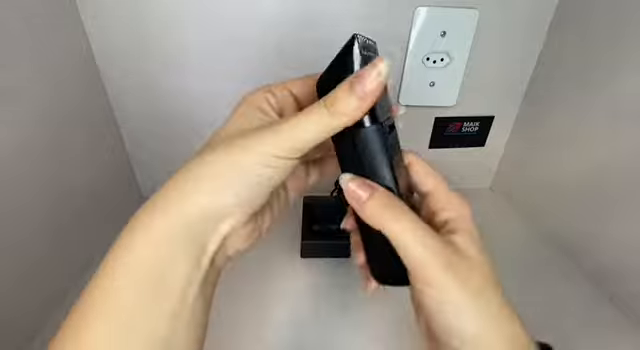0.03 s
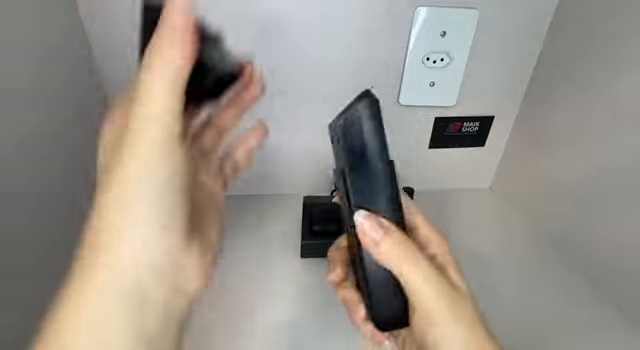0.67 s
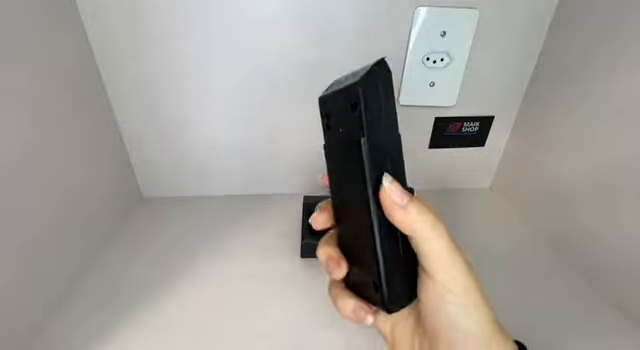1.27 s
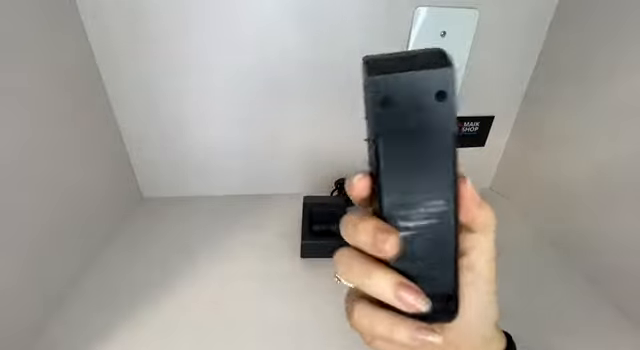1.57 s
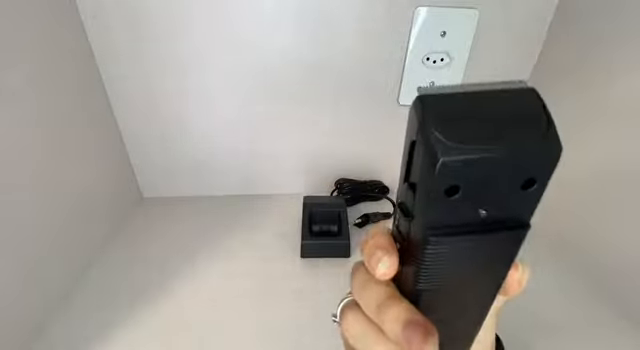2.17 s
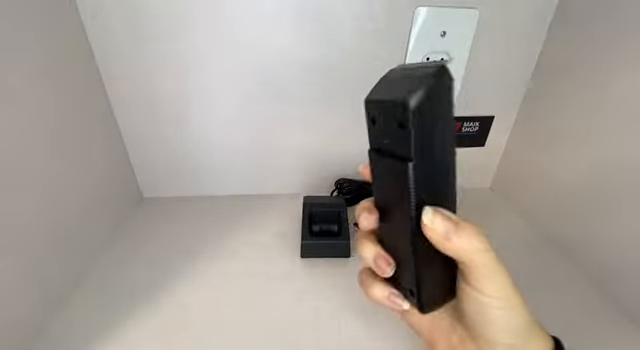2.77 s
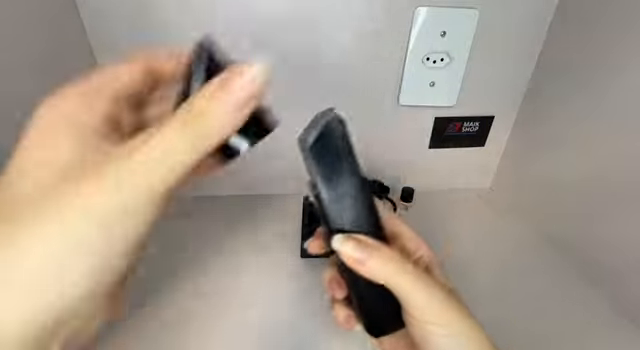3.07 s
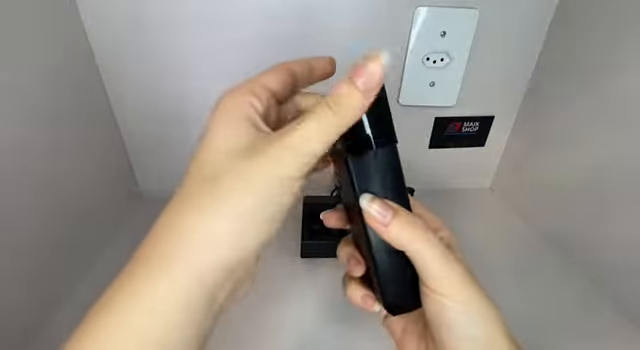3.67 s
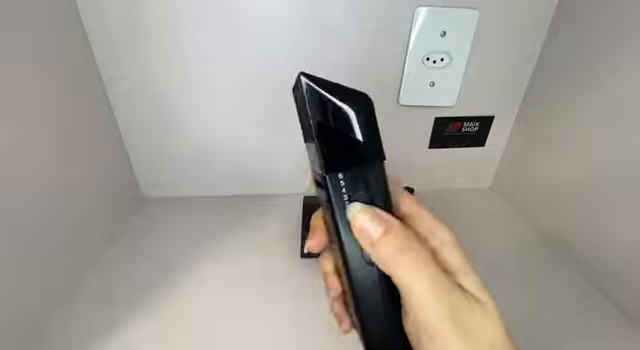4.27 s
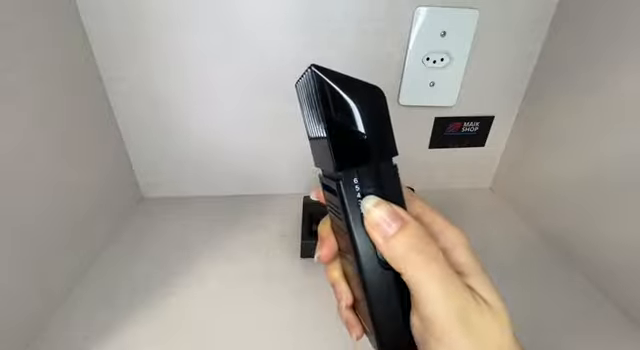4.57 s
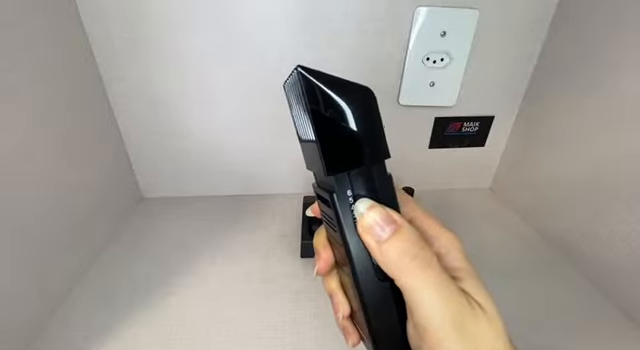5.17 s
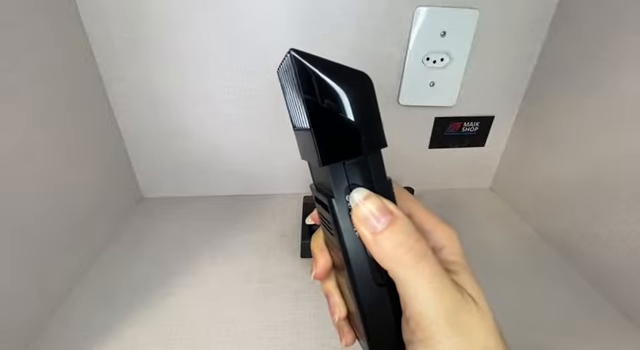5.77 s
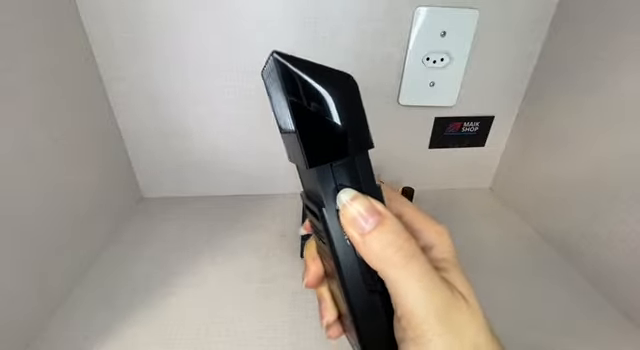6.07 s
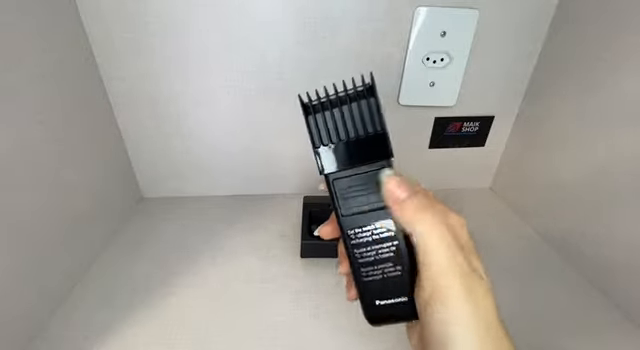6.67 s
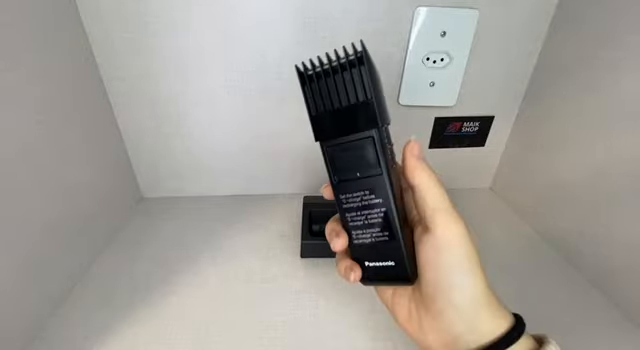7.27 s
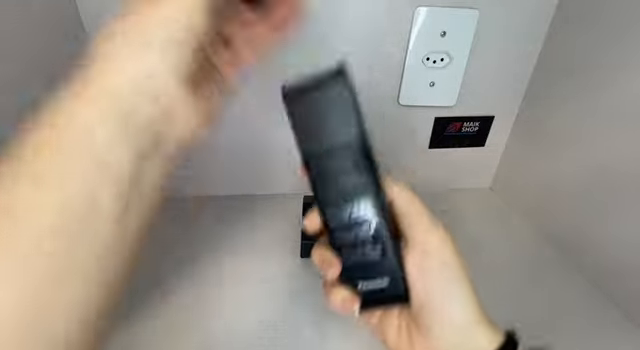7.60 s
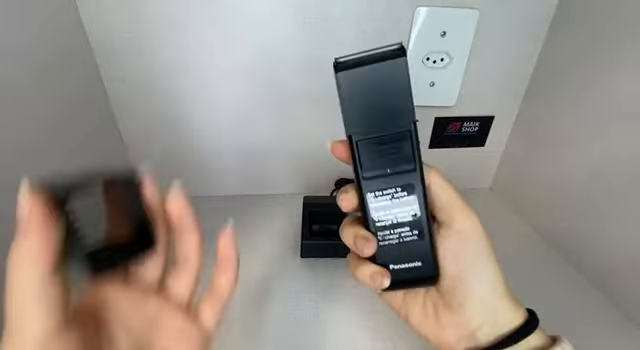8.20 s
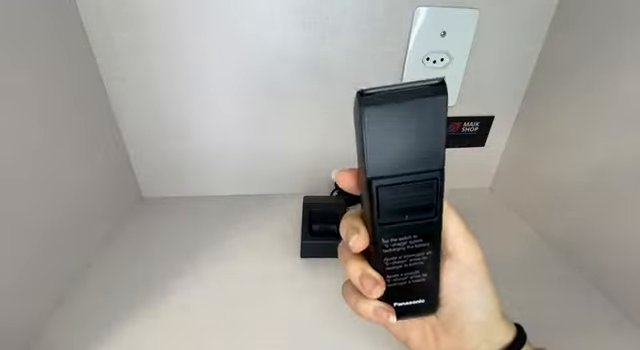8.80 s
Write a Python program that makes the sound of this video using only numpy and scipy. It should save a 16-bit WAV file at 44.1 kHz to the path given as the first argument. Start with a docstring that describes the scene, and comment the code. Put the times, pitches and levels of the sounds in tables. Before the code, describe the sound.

A small hair trimmer is handled close up in a shelf niche in a quiet room, over a low rumble that thins at about 4 seconds. At 0.4 seconds its plastic comb comes off in a quick cluster of clicks, followed by faint swishes of hands. More clicks come at 3.2 seconds, then the loudest snap at 3.5 as the comb goes back on. From 4.3 to 6 seconds it steps through its settings with irregular, briefly ringing clicks and soft, hollow plastic rubbing. At 6.3 seconds a click starts the motor: an even, raspy electric buzz whose tone shifts and grows slightly as the hand turns it. At 7.5 seconds the comb is pulled off with a sharp snap, a scrape and a short chatter against the running head. The buzz then carries on, brighter, until the end at nearly 9 seconds.

```python
'''A shelf niche in a quiet room, over a low rumble: a small hair trimmer is handled.
Its plastic comb is pulled off, snapped back on and stepped through its detents; each click rings in
the plastic and the niche, and the sliding comb rubs through two hollow resonances.
Then the motor starts: the blade knocks at both ends of its stroke, the case hums, the teeth rasp.
The comb chatters as it is pulled off again, and the buzz turns brighter.'''
import sys
import numpy as np
from scipy import signal
from scipy.fft import rfft, irfft, next_fast_len
from scipy.io import wavfile

SR = 44100
rng = np.random.default_rng(int(sys.argv[2]) if len(sys.argv) > 2 else 0)


def digitize_waveform(pressure):
    """Quantize a signal to 16-bit integers and store it at the path in sys.argv[1].

    Rows of a 2-D input are taken as channels; values are limited to [-1, 1].
    """
    field = np.atleast_2d(pressure).T
    bounded = np.clip(field, -1, 1)
    quanta = np.round(bounded * 32767).astype(np.int16)
    wavfile.write(sys.argv[1], SR, quanta)


N = 389844
TIME = np.arange(N) / SR

MOTOR_ON_S, COMB_OFF_S = 6.273, 7.54
KICK_HZ, COMBED_HZ, BARE_HZ = 94.5, 101.3, 100.53  # motor turns per second
CHATTER_PEAK_S, CHATTER_HALF_S = 7.68, .085
CONTROL_SAMPLES = 200

# Case harmonics, comb on / off: (multiple of motor speed, level [dB])
HARMONICS_COMBED = [(1, -13), (2, -27), (3, -30), (4, -41), (5, -16), (6, -17), (7, -21.5), (8, -33),
                    (9, -21.5), (10, -15), (11, -9), (12, -19), (13, -6), (14, -5.5), (15, 2.5), (16, -8),
                    (17, -15), (18, -13), (19, -12.5), (20, -27), (21, -7), (22, -5), (23, -2), (24, -12),
                    (25, 3), (26, -12), (27, -10), (28, -5), (29, -1), (30, -3), (31, -14), (32, -8),
                    (33, -21), (34, -7), (35, -7.5), (36, -16), (37, -5), (38, -8), (39, -17), (40, -12.0),
                    (41, -21), (42, -3.5), (43, -1), (44, -6), (45, -10), (46, -7), (47, -11.5), (48, -8),
                    (49, -25.0), (50, -2.5), (51, -23.5), (52, -16), (53, -15), (54, -5), (55, -7),
                    (56, -3.5), (57, -12.0), (58, -15), (59, -10), (60, -19), (61, -11), (62, -8.5),
                    (63, -8)]
HARMONICS_BARE = [(1, -10.5), (2, -26.5), (3, -27.5), (4, -47), (5, -23.5), (6, -16.5), (7, -37), (8, -39),
                  (9, -21.5), (10, -7), (11, -9), (12, -10.5), (13, -11.5), (14, -17), (15, -10), (16, -30),
                  (17, -5.5), (18, -9), (19, -3), (20, -32), (21, -2.5), (22, -13), (23, -4.5), (24, -4.5),
                  (25, -6), (26, -20), (27, -7), (28, -0.5), (29, -11), (30, -4.5), (31, -3), (32, 1.5),
                  (33, -5.5), (34, 0), (35, -20), (36, -7), (37, -20), (38, -11), (39, -6), (40, -10.5),
                  (41, -17), (42, -3.5), (43, -8), (44, -4.5), (45, -22.0), (46, -9), (47, -17), (48, -4.5),
                  (49, -10), (50, 4), (51, -9.5), (52, 0.5), (53, -4), (54, -11), (55, -3), (56, -3),
                  (57, -18), (58, -13), (59, -1.5), (60, -6), (61, -10), (62, -24), (63, -15), (64, -15),
                  (65, -11)]
# Buzz as the hand turns the trimmer, comb on / off:
# (time [s], low [dB], middle [dB], bright [dB], left-right [dB], lower beam [Hz], upper beam [Hz])
BUZZ_COMBED = [(6.3, -54, -45, -59, -0.5, 2500, 4430), (6.402, -51, -48, -51, 0, 2530, 4570),
               (6.48, -49.5, -43, -51, -1, 2460, 5500), (6.61, -49, -43, -47, -1, 2420, 5500),
               (6.84, -46, -42, -44, -1, 2830, 4670), (6.924, -44.5, -42.5, -44, 0, 2930, 5500),
               (7.092, -44.5, -43, -44.5, -1, 3020, 5200), (7.192, -47.5, -43.5, -43.5, -1.5, 2900, 5040),
               (7.5, -47.5, -40, -41.5, -0.5, 2850, 4260)]
BUZZ_BARE = [(7.6, -48, -42.5, -41, 1.3, 3000, 5600), (7.688, -44.5, -39.5, -48, -0.5, 2840, 4970),
             (7.762, -48.5, -40, -38.5, 0.0, 3070, 5940), (7.97, -48.5, -40, -40, -0.57, 3350, 4900),
             (8.18, -47, -40, -36, 1.2, 2700, 5440), (8.28, -47.5, -39.5, -37.5, 0.7, 2930, 5570),
             (8.412, -48, -42, -37.5, 1.5, 2850, 5270), (8.628, -47.5, -41, -40, 0.41, 2730, 5200),
             (8.82, -48, -42.5, -38, -0.21, 2780, 5240)]


def trimmer(treble_db, bare_boost_db, shake_db, damping):
    """The motor swings the blade in its case; the comb covers part of the treble."""
    bare = np.clip((TIME - COMB_OFF_S) / .012, 0, 1)
    combed = np.clip((TIME - MOTOR_ON_S) / .0092, 0, 1) - bare
    turns = motor_turns(bare)
    hum = combed * case_hum(turns, HARMONICS_COMBED, BUZZ_COMBED, heard=combed > 0)
    hum += bare * case_hum(turns, HARMONICS_BARE, BUZZ_BARE, heard=bare > 0)
    hum *= from_db(shake_db * drift(41))
    hum *= 1 - damping * bell(TIME, CHATTER_PEAK_S, CHATTER_HALF_S)  # the sliding comb damps the case
    treble = blade_clatter(turns, combed, bare) + teeth_rasp(turns, combed, bare)
    treble *= from_db(treble_db + bare_boost_db * bare)
    *_, pan_db, _, _ = curves([*BUZZ_COMBED, *BUZZ_BARE])
    return panned(pan_db) * (hum + treble + comb_chatter(turns))


def motor_turns(bare, spin_up_s=.022, sag_hz_per_s=.24, flutter=.0005):
    """Turn count: quick spin-up, slow sag under the rubbing comb, then steady and slightly slower."""
    running_s = np.maximum(TIME - MOTOR_ON_S, 0)
    spin_up_hz = COMBED_HZ - (COMBED_HZ - KICK_HZ) * np.exp(-running_s / spin_up_s)
    combed_hz = spin_up_hz - sag_hz_per_s * running_s
    speed_hz = (TIME > MOTOR_ON_S) * ((1 - bare) * combed_hz + bare * BARE_HZ)
    return np.cumsum(speed_hz * (1 + flutter * drift(25))) / SR


# Trimmer's path through the niche: (time [s], distance [m])
HAND_TRAVEL = [(6.27, 0), (6.65, .04), (7.0, .11), (7.5, .16), (7.85, .27), (8.3, .33), (8.84, .37)]
# Standing waves, opposite in the two channels: (centre [Hz], half width [Hz], level [dB])
STANDING_WAVES = [(1140, 90, 11.5), (1830, 210, 5)]


def case_hum(turns, harmonics, buzz, heard, trim_db=(-1.24, -.35, -2), echo_db=-1, waver_db=-3.5):
    """Harmonics of the knocking case; beams and wall echoes swell and fade each as the hand moves."""
    steps_s = TIME[heard][::CONTROL_SAMPLES]
    *band_db, _, lower_hz, upper_hz = curves(buzz, steps_s)
    travel_m, = curves(HAND_TRAVEL, steps_s)
    multiples, level_db = np.transpose(harmonics)
    hz = multiples[:, None] * BARE_HZ
    beam_db = 4.5 * (bell(hz, lower_hz, half_width=330) + bell(hz, upper_hz, half_width=330))
    gain = from_db(level_db[:, None] + beam_db - beam_db.mean(axis=1, keepdims=True))
    short_waves = 1 / (1 + (1500 / hz) ** 2)
    standing = sum(from_db(db) * bell(hz, centre, half) for centre, half, db in STANDING_WAVES)
    mid = gain * (1 + from_db(echo_db) * wall_echoes(hz, travel_m) * short_waves)
    side = gain * (from_db(echo_db) * wall_echoes(hz, travel_m) + 1j * standing)
    swells = np.array([mid + side, mid - side])
    swells += from_db(waver_db) * short_waves * gain * blade_waver((2, *gain.shape))
    bands = np.digitize(hz[:, 0], (2000, 4000))  # low, middle, bright
    for band, db in enumerate(band_db):
        band_rms = np.sqrt(np.sum(np.abs(mid[bands == band]) ** 2, axis=0) / 2)
        swells[:, bands == band] *= from_db(db + trim_db[band]) / band_rms
    out = np.zeros((2, N))
    for k, phase in enumerate(knock_phases(hz)):
        tone = np.exp(1j * (2 * np.pi * multiples[k] * turns[heard] + phase))
        for channel in range(2):
            out[channel, heard] += np.real(tone * np.interp(TIME[heard], steps_s, swells[channel, k]))
    return out


def wall_echoes(hz, travel_m, count=6, sound_m_per_s=343):
    """Summed echoes of each harmonic; their paths grow or shrink as the trimmer travels."""
    slant = rng.uniform(-1.005, 1, (count, 1, 1))
    detour_m = rng.uniform(.15, 2.2, (count, 1, 1))
    path_m = detour_m + 2 * slant * travel_m
    return np.exp(-2j * np.pi * hz * path_m / sound_m_per_s).sum(axis=0) / np.sqrt(count)


def blade_waver(shape, rate_hz=10):
    """The blade never seats quite the same way, so each harmonic wavers in strength and phase."""
    lowpass = signal.butter(2, rate_hz, fs=SR / CONTROL_SAMPLES, output="sos")
    real, imaginary = signal.sosfilt(lowpass, rng.standard_normal((2, *shape)))
    return (rms_one(real) + 1j * rms_one(imaginary)) / np.sqrt(2)


def knock_phases(hz, case_t60_s=.02):
    """Harmonic phases of two knocks half a turn apart, each ringing out in the case."""
    rings = reflections(case_t60_s, rise_s=.0002, size=SR // 50)
    forth, back = np.exp(-2j * np.pi * hz * TIME[:SR // 50]).dot(rings.T).T
    return np.angle(forth + back * np.exp(-1j * np.pi * hz[:, 0] / BARE_HZ))


def blade_knocks(turns, return_db=-6.5, uneven_db=2.5):
    """The blade knocks at both ends of its stroke with uneven force."""
    knocks = np.zeros(N)
    for offset_turns, level_db in ((0, 0), (.5, return_db)):
        at = np.interp(np.arange(1, int(turns[-1]) - 1) + offset_turns, turns, np.arange(N))
        force = from_db(level_db + uneven_db * rng.standard_normal(N // 100)[:len(at)])
        taps = at.astype(int)[:, None] + np.arange(-4, 6)
        np.add.at(knocks, taps, force[:, None] * np.sinc(taps - at[:, None]))
    return knocks


# Clatter spectrum, comb on / off: (frequency [Hz], level [dB])
BLADE_COMBED = [(1500, -3), (4000, 4.5), (6300, 5.5), (7000, 2), (7600, -3.5), (8300, 1), (9400, -4.5),
                (10400, -2.5), (11300, -1.5), (12000, -15)]
BLADE_BARE = [(1800, -2), (4000, 2.5), (6400, 9.5), (7200, 6.5), (8000, -2), (8900, 1.5), (9900, -5.5),
              (11000, 1.5), (12000, -10.5)]


def blade_clatter(turns, combed, bare, sway_hz=1.1):
    """Knocks ring in the blade and the niche, whose echoes shift as the hand moves."""
    knocks = blade_knocks(turns)

    def ring(spectrum, t60_s, sway_rad):
        angle = sway_rad * drift(sway_hz)
        sound = coloured(shifting_ring(knocks, angle, t60_s, rise_s=.000067), spectrum)
        return sound / np.sqrt(np.mean(sound[:, TIME > MOTOR_ON_S] ** 2, axis=1, keepdims=True))

    return (combed * ring(BLADE_COMBED, t60_s=.13, sway_rad=1.23)
            + bare * ring(BLADE_BARE, t60_s=.12, sway_rad=.96))


# Rasp spectrum: (frequency [Hz], level [dB])
TEETH_SPECTRUM = [(300, -22), (800, -16), (1500, -1), (2700, 0), (5500, -2), (7500, -4), (11500, -27)]


def teeth_rasp(turns, combed, bare, rasp_db=-13, scrape_db=1, scrape_s=.068):
    """The teeth rasp twice a turn; the comb scrapes along the shaking head as it comes off."""
    rasp = rms_one(coloured(stereo_noise(0), TEETH_SPECTRUM)) * (1 + np.sin(2 * np.pi * 2 * turns))
    decay = np.exp(-np.maximum(TIME - COMB_OFF_S, 0) / scrape_s)
    scrape = bare * decay * from_db(scrape_db + 2.5 * drift(40))
    return (from_db(rasp_db) * (combed + bare) + scrape) * rasp


# Loose comb's spectrum: (frequency [Hz], level [dB])
CHATTER_SPECTRUM = [(1200, -9), (2200, -5), (3400, 5.5), (4500, 4.5), (6300, 7), (7400, -11), (11000, -33)]


def comb_chatter(turns, level_db=-35, strikes_per_turn=4, uneven_db=.5, jitter_turns=.0015):
    """The running head strikes the loose comb, whose ring shifts as it slides off."""
    slide = (TIME - CHATTER_PEAK_S) / CHATTER_HALF_S
    first, last = np.interp([-2, 2], slide, turns)
    due = np.arange(first, last, 1 / strikes_per_turn)
    late, harder = rng.standard_normal((2, N // 100))[:, :len(due)]
    at = np.searchsorted(turns, due + jitter_turns * late).clip(0, N - 1)
    strikes = np.zeros(N)
    strikes[at] = from_db(uneven_db * harder)
    ring = shifting_ring(strikes, np.pi * slide, t60_s=.028, rise_s=.0002)
    sound = coloured(ring, CHATTER_SPECTRUM)
    return from_db(level_db) * np.exp(-slide ** 4) * sound / sound[:, np.abs(slide) < 1].std()


# Plastic clicks, and a faint bright hiss just before the loudest snap; body, edge vs. middle band:
# (time [s], level [dB], body [dB], edge [dB], ring [Hz], upper ring [Hz], ring gain [dB])
SNAPS = [(0.063, -43, 12.5, -8, 1990, 4700, -8), (0.3744, -24, 12, 4.5, 2620, 8600, 1),
         (0.378, -23.5, 6.5, 5, 2180, 5700, -3), (0.39, -23, 8.5, 7, 3300, 6300, 3),
         (0.397, -23, 2, 7, 2200, 8450, 6), (0.402, -21, -2, 5.5, 2610, 8400, 10),
         (0.4076, -22, 4, 4, 2200, 6560, 7.5), (0.4152, -24.5, 3, 3.5, 3380, 8470, 5),
         (3.2349, -15, 6, -9.5, 2210, 3505, 3), (3.2427, -20, -6, -2, 2400, 6200, 6),
         (3.259, -21, 0.5, -9, 2100, 6800, 8), (3.2695, -18.5, 2, -10, 1420, 3030, 3),
         (3.465, -31, 5, 7, 2700, 5400, 0), (3.481, -6.5, 0, 4, 3030, 5390, 1.5),
         (3.963, -52, 11, -7, 2720, 2980, 5.5), (4.1119, -47, 8.5, -6, 2800, 4320, 3.5),
         (4.19, -44, -10.5, -10, 2740, 4290, 2.5), (4.315, -51.5, -8, -7, 2910, 3500, 3),
         (4.358, -26.5, -23, -3, 3160, 6500, 1.5), (4.443, -34.5, -1, 0.5, 2880, 6630, 2.5),
         (4.4481, -19.5, 2.5, 1.5, 3680, 4570, 0), (4.827, -19.5, 1, 1.5, 5050, 8440, 7),
         (4.8296, -19.5, 4, -2, 3000, 4500, 5.5), (5.1725, -37, 9, -7, 3200, 6490, 1),
         (5.1963, -27.5, 8.5, 4.5, 3310, 6700, 1.5), (5.52, -45.5, 10.5, -6.5, 1918, 5300, -4.5),
         (5.636, -36.5, -3, -2.5, 2655, 5320, 2), (5.651, -24.5, -4, -2, 3400, 7680, 2.5),
         (5.912, -46, 7.5, -9, 1640, 4020, 5), (5.973, -39, 11, -5, 3660, 8600, 1),
         (5.9957, -18.5, 0.5, 5.5, 3770, 4180, 9), (5.9995, -24.5, 11, -1, 830, 3250, 11.5),
         (6.272, -30, 4.5, -3.5, 2570, 4370, 5), (7.5281, -8.5, 0.5, -2, 4600, 7880, 7.5),
         (7.5522, -19, 0, 2.5, 2600, 5600, 5)]
# Plastic's spectrum: (frequency [Hz], level [dB])
PLASTIC_SPECTRUM = [(180, -5.5), (300, -6), (560, -11), (880, -3.5), (1150, -1.5), (2300, -1), (4700, 2),
                    (7700, 0.5), (10500, 0.5), (12000, -4.5)]


def snaps(gain_db, niche_t60_s, crack_t60_s, crack_db, ring_width_hz, room_t60_s, room_db):
    """Each crack rings briefly in the plastic and the niche, then dies away in the room."""
    cracks, notes = np.zeros((2, 2, N + SR))
    bands = [signal.butter(2, hz, kind, fs=SR, output="sos")
             for hz, kind in ((1770, "low"), ([1770, 4730], "band"), (4730, "high"))]
    size = SR // 6
    for s, level_db, body_db, edge_db, ring_hz, upper_hz, ring_db in SNAPS:
        burst = 0
        for band, gain in zip(bands, from_db([body_db, 0, edge_db])):
            niche = reflections(niche_t60_s, rise_s=.0012, size=size)
            crack = from_db(crack_db) * reflections(crack_t60_s, rise_s=.001, size=size)
            burst += from_db(level_db + gain_db) * gain * signal.sosfilt(band, niche + crack)
        rings = sum(resonance(burst, hz, ring_width_hz) for hz in (ring_hz, upper_hz))
        at = round(s * SR)
        cracks[:, at:at + size] += burst
        notes[:, at:at + size] += from_db(ring_db) * rings
    cracks, notes = (coloured(x[:, :N], PLASTIC_SPECTRUM) for x in (cracks, notes))
    send = cracks + from_db(-8.5) * notes  # weaker notes keep the tail diffuse
    tail = convolved(send, reflections(room_t60_s, rise_s=.0054))
    wall_loss = signal.butter(1, 9200, fs=SR, output="sos")
    return cracks + notes + from_db(room_db) * signal.sosfilt(wall_loss, tail)


# Finger pushes: (time [s], length [s], level [dB], resonance [Hz], second resonance [Hz])
PUSHES = [(3.166, 0.13, -61.5, 553, 880), (3.868, 0.22, -57, 525, 890), (4.628, 0.1, -58.5, 863, 607),
          (4.812, 0.11, -53, 907, 1290), (5.035, 0.097, -51, 878, 1263), (5.221, 0.11, -56, 960, 1313),
          (5.487, 0.077, -47, 905, 1507), (5.66, 0.12, -48.5, 865, 1438), (5.888, 0.18, -51.5, 898, 1640),
          (6.264, 0.65, -60, 923, 1480)]
# Broad friction spectrum: (frequency [Hz], level [dB])
RUB_SPECTRUM = [(300, -31.5), (450, -2), (750, -0.5), (1100, 4.5), (1600, -6.5), (2000, -17), (2800, -31),
                (5000, -37)]


def comb_rubbing(gain_db, broad_db, second_db, slips_per_s, slip_s):
    """Each push swells, sags and lets go; dense slips of plastic excite two hollow resonances."""
    rise_db_per_s, sag_db_per_s, fall_db_per_s = 266, 25.5, 126
    slips = (rng.random(N) < slips_per_s / SR) * from_db(3 * np.minimum(rng.exponential(1, N), 3))
    slip_envelope = signal.lfilter([1], [1, -np.exp(-1 / (slip_s * SR))], slips + 1e-9)
    friction = stereo_noise(3.3) * slip_envelope
    broad = from_db(broad_db) * rms_one(coloured(friction, RUB_SPECTRUM))
    out = 0
    for s, length_s, level_db, hz, second_hz in PUSHES:
        force = from_db(level_db - rise_db_per_s * np.maximum(s - TIME, 0)
                        - sag_db_per_s * np.clip(TIME - s, 0, length_s)
                        - fall_db_per_s * np.maximum(TIME - s - length_s, 0))
        first = hollow_note(friction, hz, width_hz=83)
        second = from_db(second_db) * hollow_note(friction, second_hz, width_hz=110)
        out += force * (first + second + broad)
    return panned(1) * from_db(gain_db) * out


def hollow_note(friction, hz, width_hz, detune=.055, grip_hz=9):
    """A hollow resonance whose pitch wanders as the grip shifts."""
    angle = np.pi / 4 * (1 + np.tanh(2 * drift(grip_hz)))
    lower, higher = (rms_one(resonance(resonance(friction, f, width_hz), f, width_hz))
                     for f in (hz * (1 - detune), hz * (1 + detune)))
    return rms_one(np.cos(angle) * lower + np.sin(angle) * higher)


DROP_S = 4.14
AFTER_DROP = np.clip((TIME - DROP_S) / .015, 0, 1)
# Rumble spectrum before / after the drop: (frequency [Hz], level [dB])
RUMBLE_EARLY = [(30, -29), (40, -6), (55, -0.5), (76, 3.5), (120, -5), (156, -12.5), (207, -26),
                (260, -48.5)]
RUMBLE_LATE = [(30, -17), (40, 0.5), (80, 3), (122, 1.5), (146, -7), (177, -12), (215, -26), (260, -54.5)]
# Rumble envelope: (time [s], level [dB])
RUMBLE_LEVEL = [(0.3, -43), (1.07, -42), (1.84, -45), (2.17, -42), (2.7, -41), (4.09, -43.5), (4.23, -53.5),
                (4.42, -47), (5.7, -52.5), (8.7, -48)]


def rumble(hum_hz, hum_db, pan_db):
    """A low rumble that thins about halfway, with a faint steady hum."""
    early, late = (rms_one(coloured(stereo_noise(-13), spectrum))
                   for spectrum in (RUMBLE_EARLY, RUMBLE_LATE))
    level_db, = curves(RUMBLE_LEVEL)
    noise = from_db(level_db) * ((1 - AFTER_DROP) * early + AFTER_DROP * late)
    hum = from_db(hum_db) * np.sqrt(2) * np.sin(2 * np.pi * hum_hz * TIME)
    return panned(pan_db) * (noise + hum)


# Room air spectrum: (frequency [Hz], level [dB])
AIR_SPECTRUM = [(150, -20), (260, -1), (400, 5), (700, -5.5), (1200, -6), (2000, -17.5), (4000, -29),
                (11000, -46)]


def room_air(early_db, late_db, dip_db, dip_half_s):
    """Soft noise that drops abruptly, dips briefly and settles lower."""
    settling_db = late_db + dip_db * bell(TIME, DROP_S, dip_half_s)
    level_db = (1 - AFTER_DROP) * early_db + AFTER_DROP * settling_db
    return from_db(level_db) * rms_one(coloured(stereo_noise(-.078), AIR_SPECTRUM))


# Swishes: (peak time [s], half length [s], level [dB])
SWISHES = [(0.2, 1, -71), (1.102, 0.55, -69.5), (3.31, 0.25, -63)]
# Swish spectrum: (frequency [Hz], level [dB])
SWISH_SPECTRUM = [(1000, -20), (2000, 5.5), (3500, 3), (7000, 0.5), (9500, -5), (11500, -9)]


def sleeve_swishes(gain_db, floor_db):
    """Moving hands and sleeves swish above a faint steady hiss."""
    power = sum(from_db(db) ** 2 * bell(TIME, s, half_s) for s, half_s, db in SWISHES)
    envelope = from_db(gain_db) * np.sqrt(from_db(floor_db) ** 2 + power)
    return envelope * rms_one(coloured(stereo_noise(-.56), SWISH_SPECTRUM))


def from_db(db):
    """Decibels to gain."""
    return 10 ** (np.asarray(db) / 20)


def rms_one(x):
    """Scale to an rms of 1."""
    return x / np.sqrt(np.mean(x ** 2) + 1e-20)


def bell(x, centre, half_width):
    """Gaussian with a peak of 1."""
    return np.exp(-((x - centre) / half_width) ** 2)


def curves(rows, at_s=TIME):
    """Each column of a time table, interpolated."""
    s, *columns = np.transpose(rows)
    return [np.interp(at_s, s, column) for column in columns]


def panned(left_right_db):
    """Left and right gains."""
    return from_db(np.array([[.5], [-.5]]) * left_right_db)


def drift(rate_hz):
    """Slow random curve, rms 1."""
    pole = np.exp(-80 * np.pi * rate_hz / SR)
    noise = rng.standard_normal(N // 40 + 2002)
    slow = signal.lfilter([1], [1, -2 * pole, pole * pole], noise)[2000:]
    return np.interp(np.arange(N) / 40, np.arange(len(slow)), rms_one(slow))


def coloured(x, spectrum):
    """Minimum-phase filter following a spectrum table, falling 24 dB per octave outside it."""
    size = 2 * next_fast_len(x.shape[-1] // 2 + SR // 10, real=True)
    hz, db = np.transpose(spectrum)
    octave = np.log2(np.maximum(np.arange(size // 2 + 1) * SR / size, 10))
    outside = np.abs(octave - np.clip(octave, np.log2(hz[0]), np.log2(hz[-1])))
    cepstrum = irfft(np.log(from_db(np.interp(octave, np.log2(hz), db) - 24 * outside)))
    cepstrum[1:size // 2] *= 2
    cepstrum[size // 2 + 1:] = 0
    return irfft(rfft(x, size) * np.exp(rfft(cepstrum)))[..., :x.shape[-1]]


def stereo_noise(side_db):
    """White mid/side noise."""
    mid, side = rng.standard_normal((2, N))
    return mid + from_db(side_db) * side * [[1], [-1]]


def resonance(x, hz, width_hz):
    """One resonance, peak gain 1."""
    return signal.lfilter(*signal.iirpeak(hz, hz / width_hz, fs=SR), x)


def reflections(t60_s, rise_s, size=SR):
    """Dense echoes that build and die; energy 1 per channel."""
    t = TIME[:size]
    echoes = rng.standard_normal((2, size)) * from_db(-60 * t / t60_s) * (1 - np.exp(-t / rise_s))
    return echoes / np.sqrt(np.sum(echoes ** 2, axis=1, keepdims=True))


def convolved(x, response):
    """Convolve with a stereo response."""
    return signal.fftconvolve(np.atleast_2d(x), response, axes=1)[:, :x.shape[-1]]


def shifting_ring(strikes, angle, t60_s, rise_s):
    """Strikes ring through two echo patterns, blended by the angle."""
    first, second = (convolved(strikes, reflections(t60_s, rise_s)) for _ in range(2))
    return np.cos(angle) * first + np.sin(angle) * second


def scene():
    """Snaps, buzz and rubbing over the background."""
    return (snaps(gain_db=14, niche_t60_s=.071, crack_t60_s=.016, crack_db=-3.5, ring_width_hz=260,
                  room_t60_s=.52, room_db=-11.5)
            + trimmer(treble_db=-45, bare_boost_db=2.5, shake_db=.65, damping=.15)
            + comb_rubbing(gain_db=2.5, broad_db=-8.5, second_db=-9.5, slips_per_s=2200, slip_s=.0033)
            + rumble(hum_hz=120, hum_db=-60.5, pan_db=-5.5)
            + room_air(early_db=-60.5, late_db=-67.5, dip_db=-8, dip_half_s=.29)
            + sleeve_swishes(gain_db=1.5, floor_db=-80.5))


def record(dry):
    """Steep low-pass at 12.1 kHz."""
    return signal.sosfilt(signal.ellip(10, .2, 80, 12100, fs=SR, output="sos"), dry)


dry = scene()
out = record(dry)
digitize_waveform(out)
```